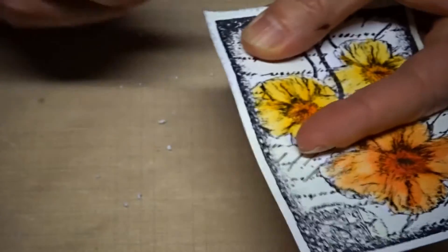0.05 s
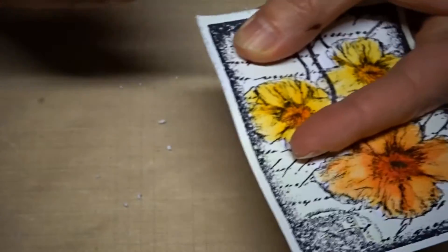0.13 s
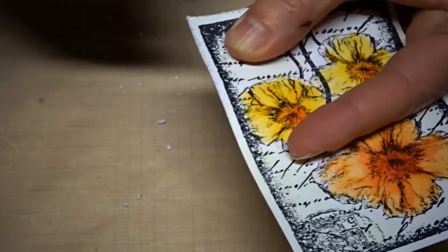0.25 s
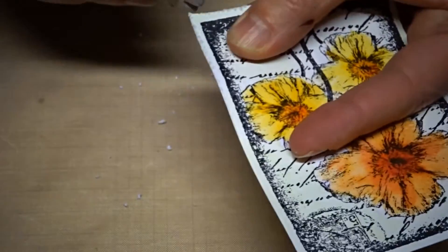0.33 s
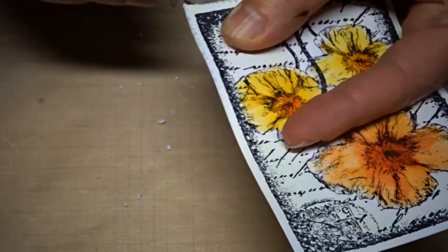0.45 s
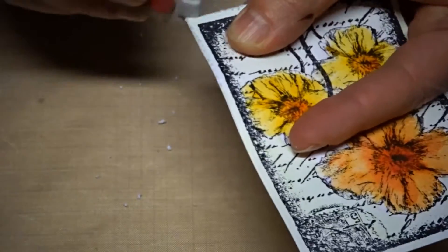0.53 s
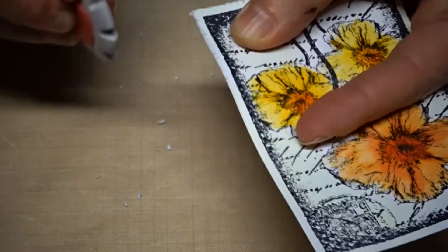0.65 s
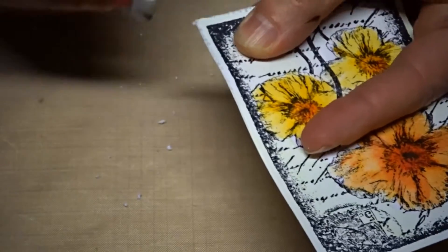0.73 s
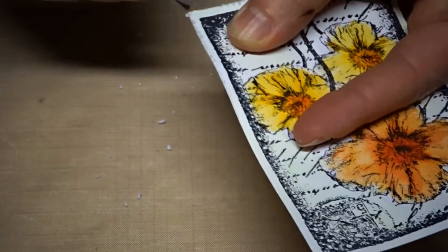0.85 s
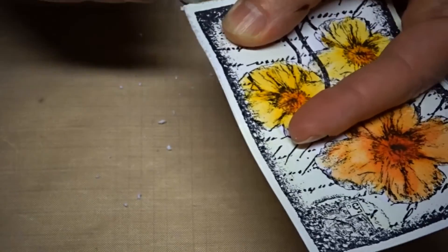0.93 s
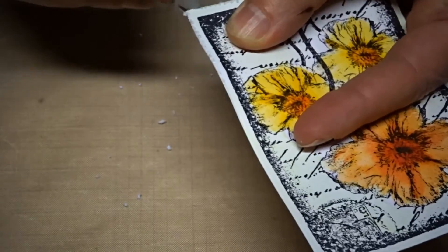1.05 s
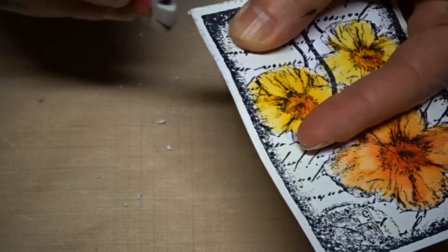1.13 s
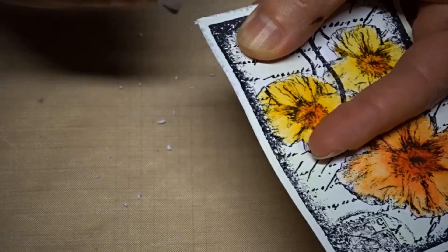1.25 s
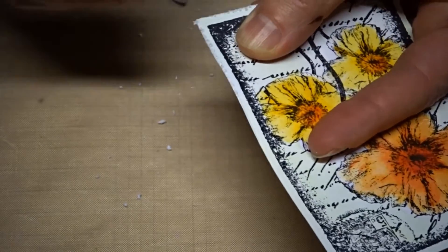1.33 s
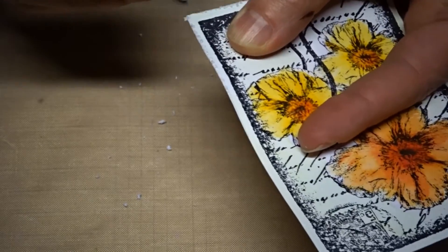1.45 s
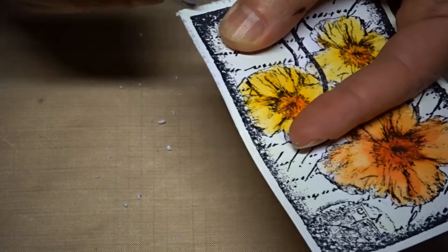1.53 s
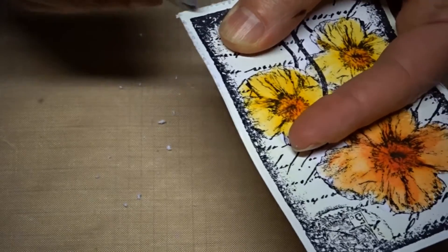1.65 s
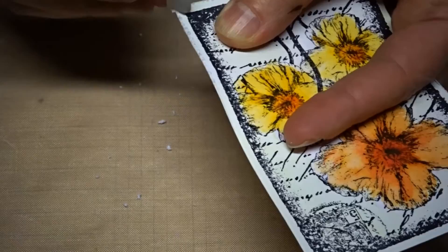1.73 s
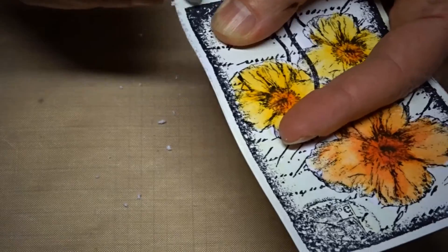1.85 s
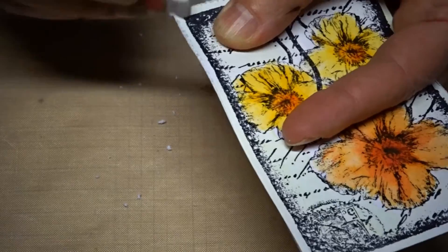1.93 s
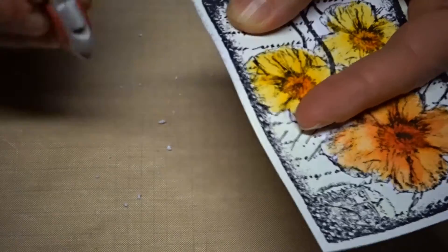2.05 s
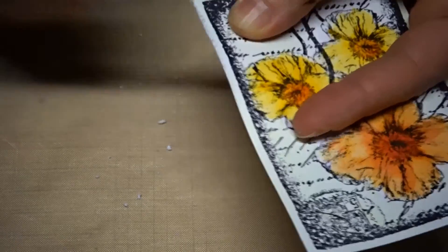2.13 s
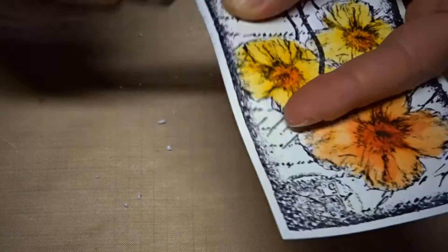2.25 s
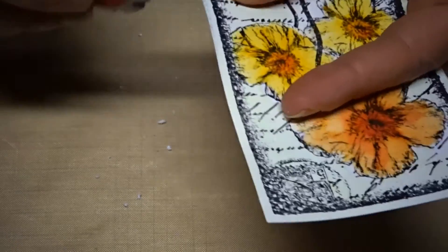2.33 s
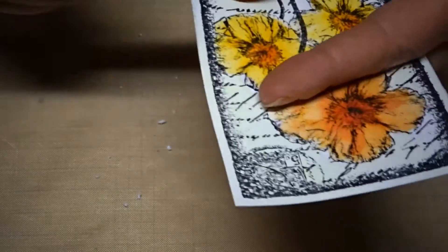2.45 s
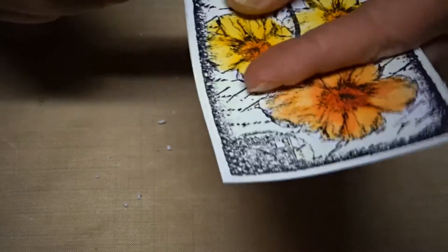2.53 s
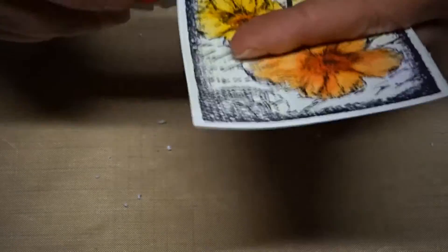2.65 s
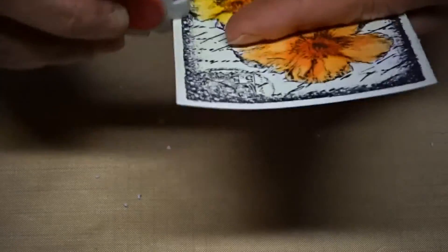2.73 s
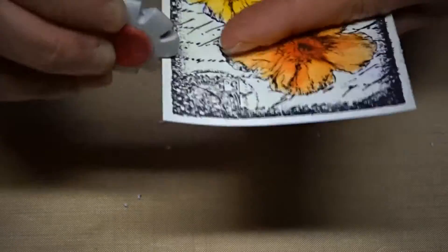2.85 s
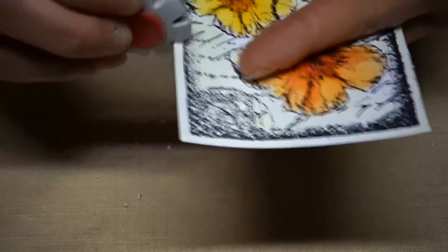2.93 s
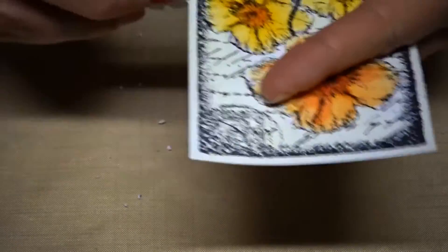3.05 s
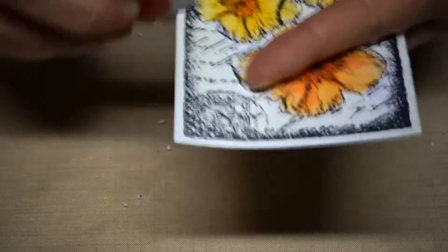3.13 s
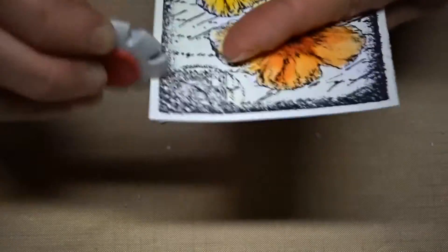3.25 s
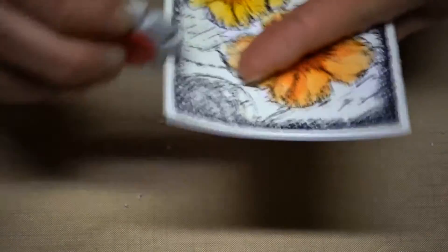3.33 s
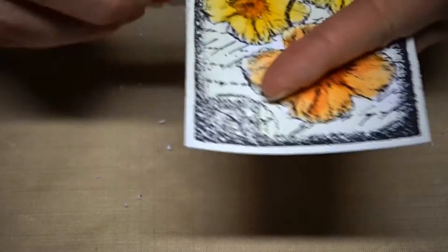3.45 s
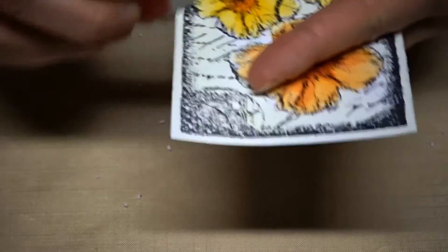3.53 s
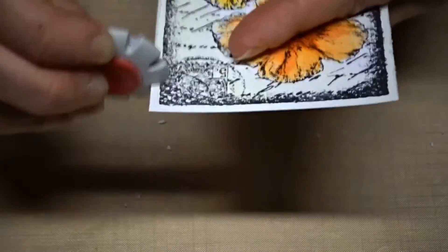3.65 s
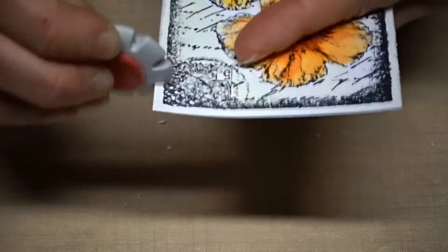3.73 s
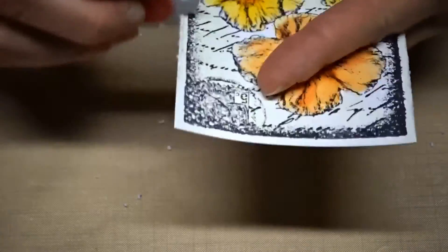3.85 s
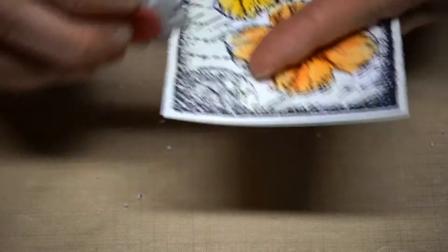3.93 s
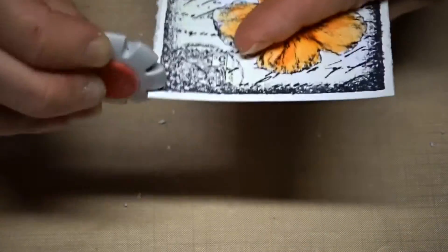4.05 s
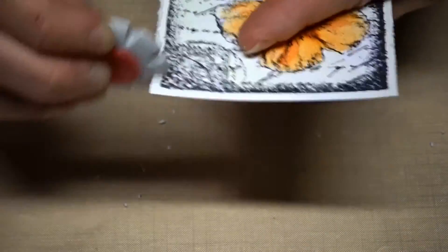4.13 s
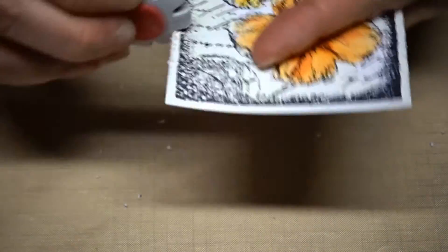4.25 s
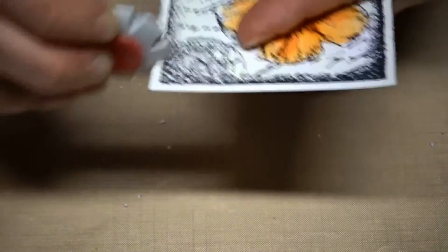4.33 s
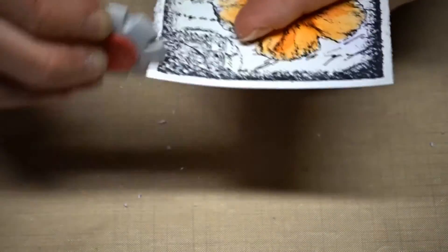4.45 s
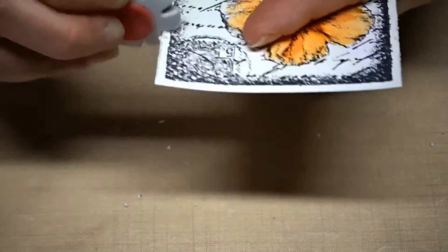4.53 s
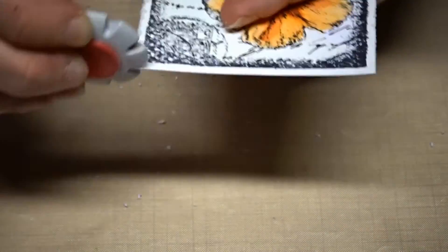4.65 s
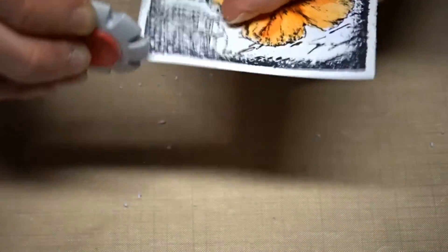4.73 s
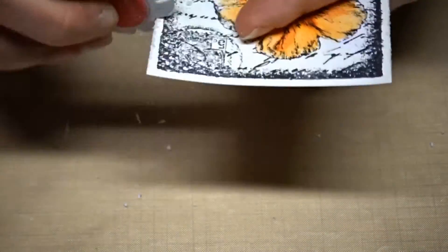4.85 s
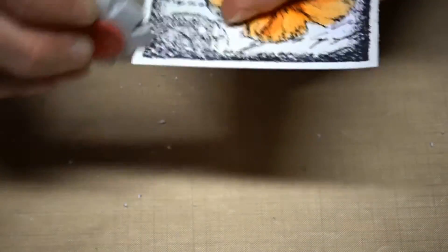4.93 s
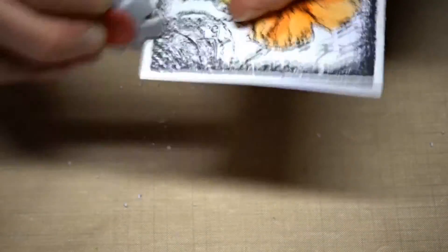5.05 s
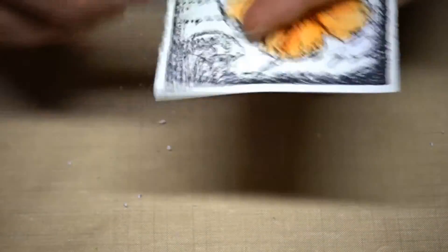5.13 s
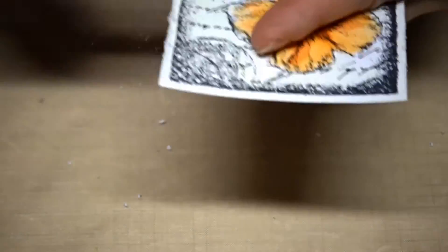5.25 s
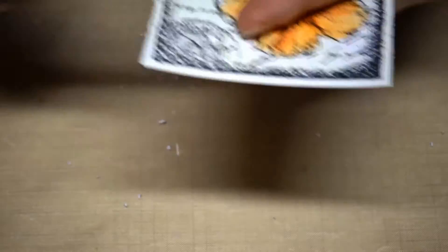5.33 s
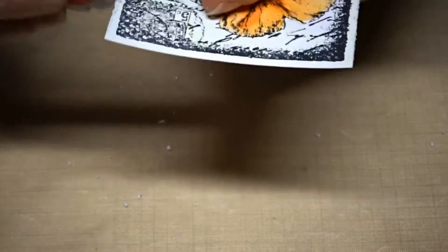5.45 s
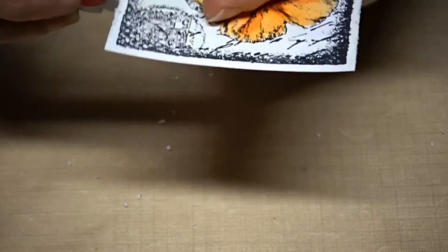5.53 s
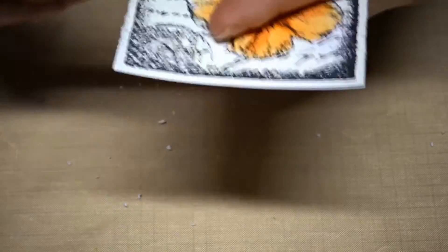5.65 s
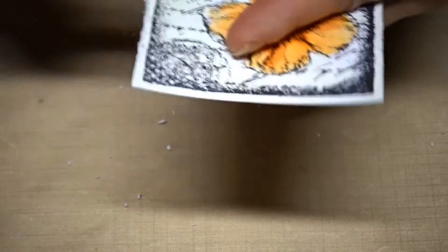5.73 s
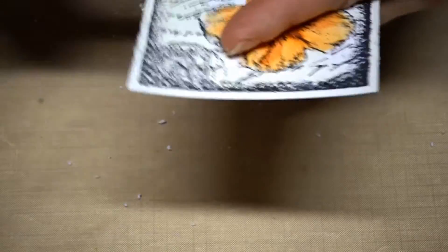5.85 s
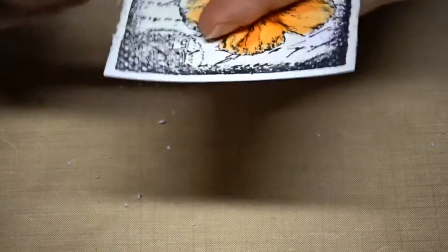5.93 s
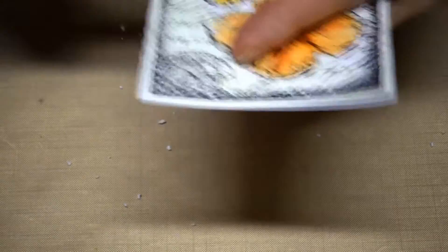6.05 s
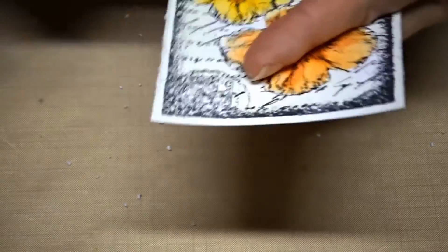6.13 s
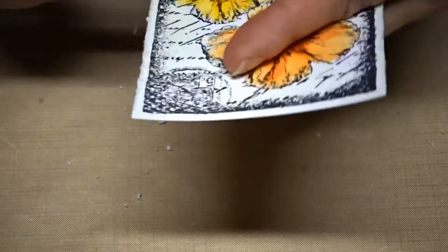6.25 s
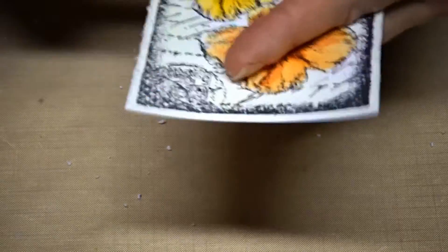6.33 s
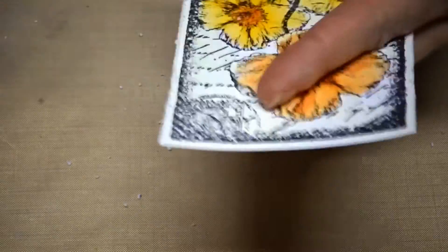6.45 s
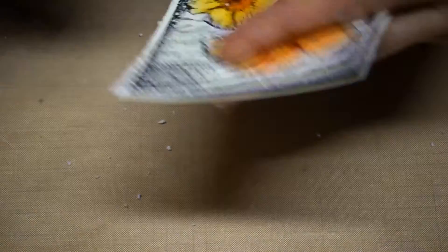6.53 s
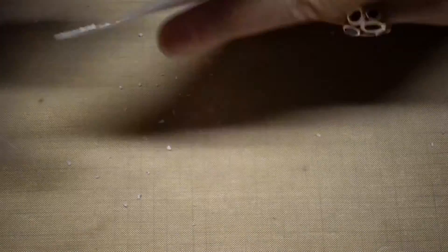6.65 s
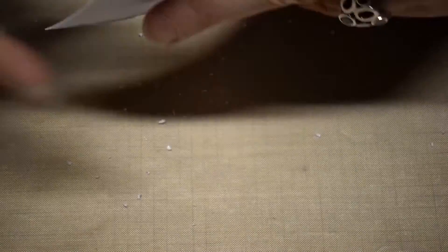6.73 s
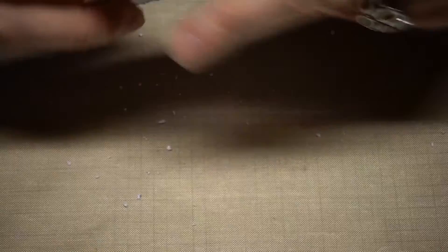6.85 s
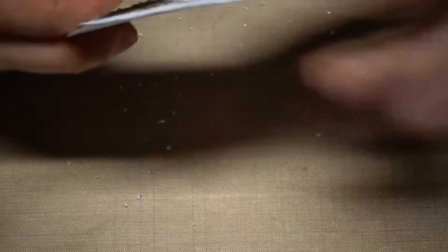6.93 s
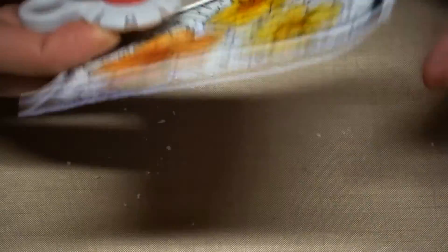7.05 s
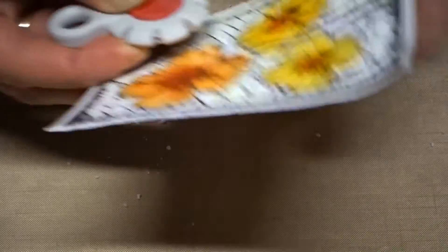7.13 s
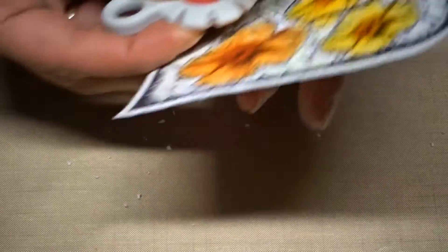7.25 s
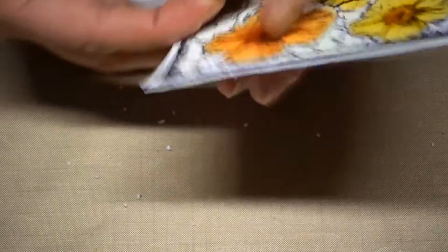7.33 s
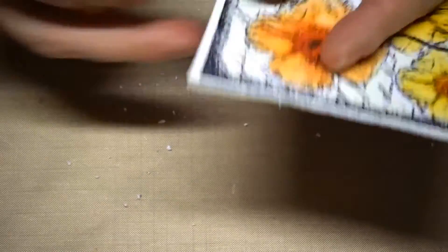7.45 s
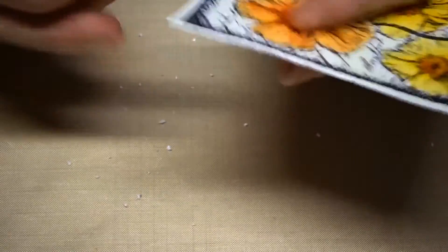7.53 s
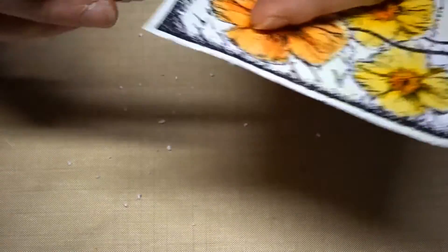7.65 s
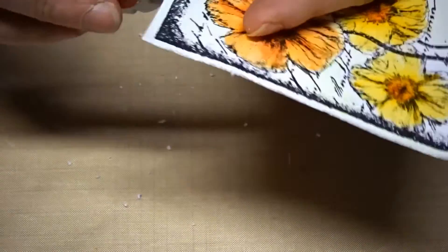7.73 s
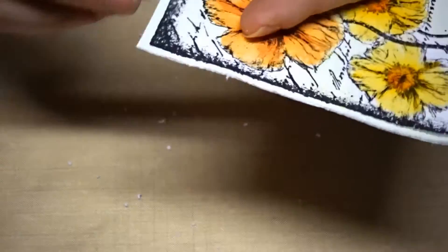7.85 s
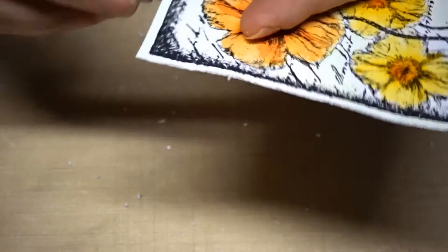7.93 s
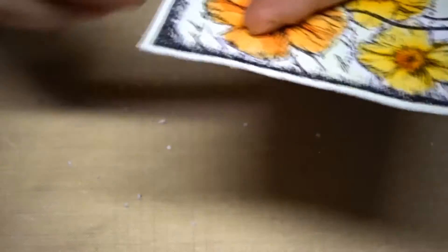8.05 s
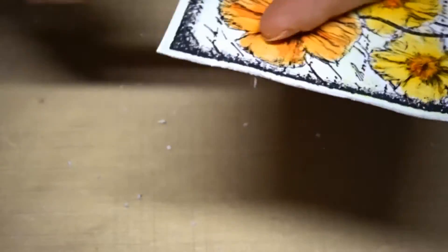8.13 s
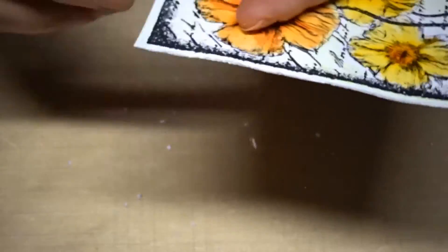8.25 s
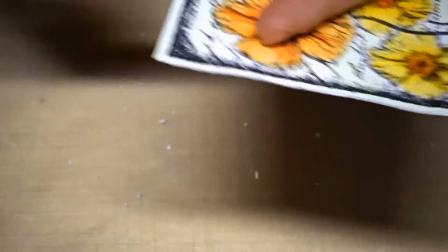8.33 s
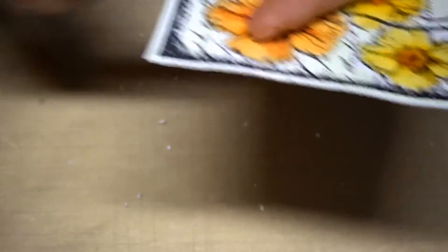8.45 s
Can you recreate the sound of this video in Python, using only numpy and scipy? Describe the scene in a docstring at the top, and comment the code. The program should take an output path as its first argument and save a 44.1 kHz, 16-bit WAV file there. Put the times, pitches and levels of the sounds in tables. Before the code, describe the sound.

Isolated faint clicks come first, then a brisk run of short papery rasps as a bladed tool frays the edge of a stiff card. The strokes pause, return with a slower stuttering grain, and stop for light rustling and soft taps on the mat. Three finer, hissier scrapes close it. Close stereo pickup, mostly centred, with short room reflections and very quiet air and hum.

```python
"""Light nicks at the corner of a paper card come first: a small bladed tool, close up on a craft table.
Quick runs of rasping strokes follow, as stick-slip impulses ring the card and tear its fibres.
The card is turned and tapped down, as brushed noise and soft knocks, and the scraping resumes.
The table top rings along through a few resonances and a small room answers with noise tails.
Shaped noise makes the quiet air, and two wavering low tones make a faint hum."""
import sys
import numpy as np
from scipy import signal
from scipy.fft import rfft, irfft, next_fast_len
from scipy.io import wavfile
from scipy.ndimage import uniform_filter1d, map_coordinates

SR = 44100
rng = np.random.default_rng(int(sys.argv[2]) if len(sys.argv) > 2 else 0)


def transcribe(signal):
    """Save signal, clipped to [-1, 1], as a 16-bit WAV file at the path in sys.argv[1]."""
    frames = np.atleast_2d(signal).T
    limited = np.clip(frames, -1, 1)
    pcm = np.round(limited * 32767).astype(np.int16)
    wavfile.write(sys.argv[1], SR, pcm)


N = 374409
TIME = np.arange(N) / SR

# Strokes of the blade: [t/s, length/s, hardest point/0-1 of length, swell up to it/dB,
# card body level/dB, card flexing level/dB, tearing fibres level/dB, flexing pitch f/Hz, glide/octaves]
BLADE_STROKES = [ (2.665, .105, 0.64, 6, -36, -45.5, -39, 930, 0),
                 (2.772, 0.16, 0.7, 4, -38.5, -41.5, -39, 970, 0.095),
                 (2.981, 0.13, 0.22, 4, -34.5, -38, -38.5, 1120, -.3),
                 (3.18, .15, 0.91, 5.5, -37, -34.5, -39, 1050, 0.32),
                 (3.404, 0.11, .5, 2.5, -33, -32.5, -34.5, 1370, 0.11),
                 (3.591, 0.15, 0.91, 9.5, -37.5, -34, -38.5, 1100, -0.32),
                 (3.823, .042, 0.3, 7, -32, -31.5, -33.5, 1200, -0.031),
                 (3.882, 0.057, 0.07, 0, -28.5, -36, -36, 1020, 0),
                 (3.993, 0.15, 0.47, 7, -41.5, -34, -41, 1100, -0.19),
                 (4.199, .093, 0.36, 6, -39.5, -34, -39.5, 900, 0.28),
                 (4.356, 0.11, 0.6, 12.5, -43, -36, -41.5, 1000, -.15),
                 (4.522, 0.08, .55, -0.5, -45.5, -39.5, -46, 930, 0.22),
                 (4.657, 0.086, 0.87, 3.5, -45.5, -38, -46.5, 880, 0.23),
                 (4.834, 0.067, 0, 9, -34, -32, -43.5, 1040, 0.069),
                 (4.952, .092, 0.75, 6, -47, -38.5, -46, 840, 0.14),
                 (5.104, 0.033, 0.55, -1.5, -40, -28.5, -40.5, 802, -0.062),
                 (5.166, 0.076, 0.86, -0.5, -36.5, -37.5, -40, 1000, -0.21),
                 (5.679, 0.058, 0, 6, -54.5, -45, -49, 930, 0),
                 (5.738, 0.13, 0.82, 5, -41.5, -42.5, -46.5, 1130, 0.19),
                 (5.93, 0.073, 0, 3, -37, -35.5, -43, 1230, -0.13),
                 (6.076, 0.12, 0.79, 9.5, -35.5, -31.5, -36.5, 943, 0.0093),
                 (6.242, .067, 0, 2, -42, -43, -41, 1170, 0.069),
                 (6.383, 0.076, 0.65, 11.5, -33.5, -29.5, -35.5, 930, 0.24),
                 (8.105, 0.094, 0.67, 5.5, -42, -40.5, -44, 1000, 0.016),
                 (8.24, 0.086, 0.35, 4, -43, -45, -51.5, 1340, -0.051),
                 (8.365, 0.092, 0.89, 9.5, -33.5, -33.5, -39, 1310, .2), ]


def flexing_pitch():
    """The free flap shortens or lengthens as the blade travels, so its pitch glides through each stroke."""
    points = []
    for start, length, *_, hz, glide in BLADE_STROKES:
        points.append((start, hz * 2 ** (-glide / 2)))
        points.append((start + length, hz * 2 ** (glide / 2)))
    return sorted(points)


# How card and blade are held: a steeper blade hisses more, harder pressure slips more slowly,
# a card pressed flat drives the table more:
# [t/s, hiss level against the fibres/dB, slip rate/per s, table contact level/dB]
BLADE_HOLD = [(2.7, -10, 222, -4), (3.6, -8, 259, -3), (4.4, -11.5, 214, -2.5), (5.1, -3, 257, -2),
              (5.85, -7, 113.4, 1), (6.1, -6, 137, 1), (6.45, -20, 138, -4.5), (8.1, 0.5, 390, -3.5),
              (8.45, 5, 360, -12)]


def held(column):
    """The grip on card and blade drifts: one column of BLADE_HOLD at every sample."""
    points = np.transpose(BLADE_HOLD)
    return np.interp(TIME, points[0], points[column])


# How strongly each layer follows the pressure: [card body, card flexing, tearing fibres] in dB per dB
PRESSURE_FOLLOW = [1.04, 0.92, 1.32]
# Tone of the card body: [f/Hz, relative level/dB]
BODY_TONE = [(60, -35), (130, -40), (200, -20), (320, -6), (520, -1), (900, -2), (1150, -13.5), (1450, 5.5),
             (1800, -2), (2400, -4), (2900, -16), (5000, -26.5), (15000, -58.5)]
# Tone of the whole sheet sagging: [f/Hz, relative level/dB]
SAG_TONE = [(60, -26), (130, -18.5), (200, -1), (320, 6), (450, -4.5), (650, -15.5), (2000, -42)]
# Tone of the tearing fibres: [f/Hz, relative level/dB]
FIBRE_TONE = [(800, -38.5), (2000, -15), (3000, 0.5), (3900, 5), (4800, 3.5), (5700, -10), (7000, -9.5),
              (9000, -17.5), (15000, -20.5)]
# Tone of the blade's hiss: [f/Hz, relative level/dB]
HISS_TONE = [(1800, -36), (2600, 7), (3400, -4.5), (5800, 2.5), (7800, -4.5), (9000, -9.5), (15000, -8.5)]


def scraping():
    """The blade sticks and slips along the edge: each slip jolts the card and tears a burst of fibres."""
    levels = [row[:-2] for row in BLADE_STROKES]
    # exit_db: the hand presses this much more lightly as a stroke ends
    body, flex, fibres = gains(levels, rise=0.019, fall=0.0059, exit_db=8.5, follow=PRESSURE_FOLLOW)
    hiss_db, slip_rate, contact_db = held(1), held(2), held(3)
    slip_bursts = fading(slips(slip_rate, scatter=.65, size_db=2.5), life=.0025)
    tearing = unit(slip_bursts) + .55  # the constant keeps some grain between the slips

    def crackle():
        grains = slips(rate=3500, scatter=.9, size_db=1.0)
        return unit(tearing * grains * rng.standard_normal(N))

    def rung(spectrum):
        return steady(shifting(coloured(crackle(), spectrum), depth_db=3.5))

    # the free flap of card beside the blade rings; the whole sheet sags with it
    flap = steady(gliding(crackle(), flexing_pitch(), width=0.54))
    flexing = flap * amp(-3.0) + rung(SAG_TONE) * amp(contact_db - 15.5)
    card = body * rung(BODY_TONE) * amp(-1.0) + flex * flexing

    # now and then a fibre bundle snaps on its own
    bundle_snaps = unit(coloured(slips(rate=60, scatter=.9, size_db=3.5), FIBRE_TONE))
    torn = rung(FIBRE_TONE) + amp(hiss_db) * rung(HISS_TONE) + amp(-10) * bundle_snaps
    return card + fibres * torn * amp(-1.0)


def blows(rows, lead, lead_db, dull, knock_db, bright, snap_db):
    """Each contact grazes briefly, then lets go: a dull knock of the card and a bright snap."""
    track = np.zeros(N)
    t = np.arange(-SR // 30, SR // 25) / SR
    for s, db, treble_db, life in rows:
        graze = amp(lead_db) * np.exp(-np.abs(t) / lead)
        release = np.exp(-np.abs(t) / life)
        shape = np.where(t < 0, graze, release)
        begin = s + t[0]
        skip = max(round(-begin * SR), 0)  # samples that would fall before the start
        for spectrum, level in (dull, db + knock_db), (bright, db + treble_db + snap_db):
            burst = signal.fftconvolve(shape * rng.standard_normal(len(t)), impulse(spectrum))
            burst = amp(level) * burst / np.linalg.norm(burst)
            add(track, begin, burst[skip:])
    return track


# The blade catches hard within a stroke: [t/s, level/dB, treble level against it/dB]
HARD_CATCHES = [(3.404, -10.5, -15.5), (3.424, -25.5, -1.5), (3.885, -12.5, -9.5), (4.57, -23.5, -17),
                (4.832, -9.5, -27.5), (5.174, -15, -10.5), (5.226, -18.5, -19), (5.682, -32, -14),
                (5.739, -25.5, -14.5), (5.754, -21, -20), (5.797, -20, -17), (5.83, -20.5, -17),
                (5.852, -23.5, -16), (6.076, -24.5, -16), (6.121, -15, -33), (6.148, -17.5, -13.5),
                (6.388, -19, -19), (6.403, -21, -10), (6.419, -16.5, -11), (6.428, -16, -17),
                (6.449, -14, -15)]
# Tone of a dull knock on the card: [f/Hz, relative level/dB]
KNOCK_TONE = [(70, -48), (200, -16), (350, -6), (550, -5), (750, -1), (1400, 4.5), (2000, -11), (3000, -11),
              (6000, -23), (15000, -36)]


def catches():
    """The blade ticks as it meets the edge and catches hard on fibres: short knocks with a fibrous snap."""
    rows = [(*row, .002) for row in HARD_CATCHES]
    for start, _, _, _, body_db, *_ in BLADE_STROKES:
        rows.append((start, body_db + 7, -14.5, .002))  # landing tick: level follows the stroke's body
    return blows(rows, lead=0.0016, lead_db=-17, dull=KNOCK_TONE, knock_db=10.5,
                 bright=FIBRE_TONE, snap_db=19)


# The blade flicks off the corner: [t/s, level/dB, treble level against it/dB, life/s]
CORNER_NICKS = [(0.014, -29.5, -11.5, 0.00043), (0.022, -29.5, -12.5, 0.0024), (0.631, -34, -8.5, 0.0054),
                (1.183, -46.5, -9.5, 0.0027), (1.763, -51.5, 3, .014), (2.011, -40.5, -9, 0.0023),
                (2.033, -42.5, -17, 0.005), (2.039, -21.5, -17.5, 0.0012), (2.327, -21.5, -23.5, 0.0032),
                (2.645, -25, -19, 0.0048)]
# Tone of the bright flick: [f/Hz, relative level/dB]
SNAP_TONE = [(600, -3), (1400, -0.5), (2200, 9.5), (3000, -4.5), (4400, 4.5), (6000, -3.5), (9000, -6),
             (15000, -17.5)]


def nicks():
    """The blade drags at the corner and flicks off: a graze, then a knock and snap that die away."""
    return blows(CORNER_NICKS, lead=0.0092, lead_db=-11.5, dull=KNOCK_TONE, knock_db=8.5,
                 bright=SNAP_TONE, snap_db=25.5)


# Tool and card knock softly together and on the mat: [t/s, level/dB, treble level against it/dB]
SOFT_TAPS = [(5.611, -44, -4), (5.641, -34.5, -4.5), (6.595, -39, -20), (6.969, -38.5, -28),
             (7.168, -51, 3), (7.325, -43, -30), (7.422, -23.5, -11.5), (7.452, -31, -8),
             (7.488, -29.5, -7.5), (7.614, -40, -10), (7.669, -33, -13), (7.768, -31, -17),
             (7.899, -33, -23), (7.927, -37, -17), (8.033, -42, -13)]
# Tone of a soft tap: [f/Hz, relative level/dB]
TAP_TONE = [(70, -33), (250, -18.5), (450, -6), (720, 0), (1000, -1.5), (1400, -0.5), (1900, -11.5),
            (3000, -20), (6000, -27), (15000, -60)]


def taps():
    """Tool, card and mat meet softly: mostly dull bursts, with little graze before them."""
    rows = [(*row, .003) for row in SOFT_TAPS]
    return blows(rows, lead=0.0031, lead_db=-37, dull=TAP_TONE, knock_db=12.0,
                 bright=FIBRE_TONE, snap_db=12)


# The card slides under the fingers: [t/s, length/s, fastest point/0-1 of length, swell up to it/dB,
# brushing level/dB, rubbing on the mat level/dB]
CARD_SLIDES = [ (.585, 0.028, 0.2, 0, -68, -66), (1.158, 0.024, .9, 10, -58, -69),
               (1.885, 0.037, 1, 8, -60, -70), (2.52, 0.13, 0.44, 7.5, -53.5, -55.5),
               (5.57, 0.064, .4, 3, -62, -64.5), (6.52, 0.13, 0.97, 12, -61.5, -55),
               (6.67, 0.079, .7, 13, -61, -66), (6.872, 0.1, 1, 16, -48, -60),
               (7.04, 0.17, .7, 1, -59, -66.5), (7.32, 0.22, 0, -3, -69, -62.5),
               (7.43, 0.095, 0.94, 1, -54.5, -51), (7.59, 0.057, 0.3, 3, -58.5, -64),
               (7.91, 0.07, 0.3, 5, -61, -56.5), ]
# Tone of fingers brushing the card: [f/Hz, relative level/dB]
BRUSH_TONE = [(800, -41), (1500, 1), (2200, 3.5), (2520, 4.5), (3100, -3.5), (5400, -2.5), (8000, -11.5),
              (15000, -14.5)]


def sliding():
    """Fingers brush over the card while it rubs on the mat, with small irregular crinkles."""
    brush, rub = gains(CARD_SLIDES, rise=0.01, fall=0.029, exit_db=6, follow=[1, .7])
    crinkles = unit(fading(slips(rate=70, scatter=1.0, size_db=-0.5), life=0.0024))
    grain = amp(0.68 * wobble(60)) * (1.5 + .5 * crinkles)

    def rustle(spectrum):
        return unit(shifting(coloured(grain * rng.standard_normal(N), spectrum), depth_db=1.0))

    return brush * rustle(BRUSH_TONE) * amp(-2.5) + rub * rustle(KNOCK_TONE) * amp(-4.0)


# Resonances of the table top: [f/Hz, width/Hz, relative level/dB]
TABLE_MODES = [(333, 19, 4), (422.2, 22.6, 10), (611, 9.3, -5), (713, 98, 3), (1289, 35, -1.5)]


def on_table(x):
    """The table top rings along, in a few resonances, as far as the card is pressed onto it."""
    def modes(f):
        return sum(amp(db) * 1j * f * w / (hz * hz - f * f + 1j * f * w) for hz, w, db in TABLE_MODES)

    return amp(-0.5) * (x + filtered(x * amp(held(3)), modes))


# Decay of the room: [f/Hz, time to fall 60 dB/s]
ROOM_DECAY = [(150, 0.87), (400, 0.32), (1000, 0.27), (3000, 0.3), (7000, 0.29), (15000, 0.47)]


def room(x, size=256, count=24):
    """Two unrelated diffuse tails, redrawn for each span of time; each frequency dies at its own speed."""
    out = np.zeros((2, N))
    for piece in np.array_split(np.arange(N), count):
        hz, t, z = signal.stft(rng.standard_normal((2, SR // 2)), SR, nperseg=size)
        decay = amp(-60 * t / along(ROOM_DECAY, hz)[:, None])
        onset = 1 - np.exp(-t / 0.0007)
        tails = signal.istft(z * decay * onset, SR, nperseg=size)[1]
        for channel, tail in zip(out, tails):
            add(channel, piece[0] / SR, signal.fftconvolve(x[piece], tail / np.linalg.norm(tail)))
    return out


# Tone of the room air: [f/Hz, relative level/dB]
AIR_TONE = [(25, -15), (45, -17), (70, -11), (100, -11), (130, -12), (200, -16), (320, -17), (550, -20),
            (1200, -24.5), (3000, -31.5), (8000, -37.5), (15000, -45)]
# Stereo spread of the room air: [f/Hz, side level against the middle/dB]
AIR_SPREAD = [(60, -23.5), (300, -4), (1000, 1.5), (4000, 1), (15000, 1)]
# A low hum comes and goes: [t/s, relative level/dB]
DRONE_LEVEL = [(1.7, -93), (2.1, -75), (2.35, -69), (2.8, -71.5), (3.2, -98)]


def background():
    """Quiet stereo room air from shaped noise, and the hum of appliances from two wavering sines."""
    mid, side = (unit(coloured(rng.standard_normal(N), AIR_TONE)) for _ in range(2))
    side = filtered(side, lambda hz: amp(along(AIR_SPREAD, hz)))
    air = amp(-67.5) * np.array([mid + side, mid - side])

    hum_gain = amp(-73 + 1.2 * wobble(3))
    hum = hum_gain * unit(np.sin(2 * np.pi * 100 * TIME + .3 * wobble(2.4)))

    drone_gain = amp(np.interp(TIME, *np.transpose(DRONE_LEVEL)))
    drone = drone_gain * unit(np.sin(2 * np.pi * 134 * TIME + .3 * wobble(6.4)))
    return air + hum + drone


def gains(gestures, rise, fall, exit_db, follow):
    """One gain curve per level column: a gesture sets in, swells to its crest, eases off and dies away."""
    total, t = 0, TIME[::32]  # curves drawn at every 32nd sample
    for start, length, crest, swell_db, *levels_db in gestures:
        crest = np.clip(crest, .02, .98)
        u = np.clip((t - start) / length, 0, 1) - crest
        before_db = swell_db * (u / crest) ** 2
        after_db = exit_db * (u / (1 - crest)) ** 2
        effort_db = -np.where(u < 0, before_db, after_db)
        onset = np.clip((t - start) / rise + .5, 0, 1)
        release = np.exp(-np.maximum(t - start - length, 0) / fall)
        level = amp(np.array(levels_db)[:, None] + np.outer(follow, effort_db))
        total = total + onset * release * level
    return [np.interp(TIME, t, g) for g in total]


def slips(rate, scatter, size_db):
    """Impulses at uneven intervals and of uneven size; the rate per second may change with time."""
    gap, size = rng.standard_normal((2, N // 4))
    travel = np.cumsum(rate * np.ones(N)) / SR
    gaps = np.exp(scatter * gap - scatter ** 2 / 2)  # mean gap of 1
    at = np.searchsorted(travel, np.cumsum(gaps))
    return np.bincount(at[at < N], amp(size_db * size[at < N]), N)


def fading(x, life):
    """Every impulse in x dies away exponentially over life seconds."""
    return signal.lfilter([1], [1, -np.exp(-1 / (life * SR))], x)


def shifting(x, depth_db, size=512):
    """Many small resonances come and go: a smooth random field lifts and lowers patches of the spectrum."""
    z = signal.stft(x, nperseg=size)[2]
    field = uniform_filter1d(rng.standard_normal(z.shape), size=3, axis=0)
    field = uniform_filter1d(field, size=6, axis=1)
    return signal.istft(z * amp(depth_db * unit(field)), nperseg=size)[1][:N]


def gliding(x, points, width, size=512):
    """x through a resonance that follows (s, Hz) points; width is relative to its pitch."""
    hz, t, z = signal.stft(x, SR, nperseg=size)
    ratio = (hz[:, None] + 1) / np.interp(t, *np.transpose(points))
    resonance = 1 / (1 + ((ratio - 1 / ratio) / width) ** 2)
    return signal.istft(z * resonance, nperseg=size)[1][:N]


def impulse(spectrum, size=2048):
    """The causal minimum-phase response of energy 1 that has this spectrum's shape."""
    cepstrum = irfft(np.log(amp(along(spectrum, np.fft.rfftfreq(size, 1 / SR)))))
    cepstrum[1:size // 2] *= 2  # folding the cepstrum forward makes the response causal
    cepstrum[size // 2 + 1:] = 0
    h = irfft(np.exp(rfft(cepstrum)))
    return h / np.linalg.norm(h)


def coloured(x, spectrum):
    """x rung through a spectrum."""
    return signal.oaconvolve(x, impulse(spectrum))[:N]


def filtered(x, response):
    """x times a complex response of frequency."""
    m = next_fast_len(N + SR // 2)
    return irfft(rfft(x, m) * response(np.fft.rfftfreq(m, 1 / SR)), m)[..., :N]


def steady(x, size=1100):
    """x with its slow level held at 1, its fine grain kept."""
    return x / np.sqrt(np.abs(uniform_filter1d(x ** 2, size)) + 1e-9)


def wobble(rate):
    """A smooth random curve, rate knots a second."""
    t = TIME[::16]
    knots = rng.standard_normal(int(N * rate / SR) + 4)
    return np.interp(TIME, t, map_coordinates(knots, [t * rate]))


def along(points, hz):
    """(Hz, value) points read on a log frequency axis."""
    f, v = np.transpose(points)
    return np.interp(np.log(hz + 1), np.log(f + 1), v)


def amp(db):
    """Decibels to gain."""
    return 10 ** (np.asarray(db) / 20)


def unit(x):
    """x at rms 1."""
    return x / np.sqrt(np.mean(x ** 2) + 1e-20)


def add(track, s, sound):
    """Mix a sound in at s seconds."""
    i = max(round(s * SR), 0)
    track[i:i + len(sound)] += sound[:max(N - i, 0)]


# Stereo spread of the reflections: [f/Hz, relative side level/dB]
REFLECTION_SPREAD = [(100, -34.5), (600, -29), (1400, -17), (2800, -11.5), (5600, -7), (10000, -5),
                     (15000, -12.5)]


def scene():
    """The card lies straight ahead; reflections spread the treble to the sides."""
    near = on_table(scraping() + nicks() + catches() + taps() + sliding())
    echo, side_echo = room(near)
    mid = near + amp(-8.0) * echo
    glance = np.pad(near, (round(0.0045 * SR), 0))[:N]  # a first bounce off the table
    reflections = amp(-2) * side_echo + amp(-7.5) * glance
    side = filtered(reflections, lambda hz: amp(along(REFLECTION_SPREAD, hz)))
    balance = amp([[-.26], [.26]])  # left a touch softer than right
    return (np.array([mid + side, mid - side]) + background()) * balance


def record(dry):
    """A steep band limit: nothing is kept from 15300 Hz upward."""
    return filtered(dry, lambda hz: hz < 15300)


dry = scene()
out = record(dry)
transcribe(out)
```